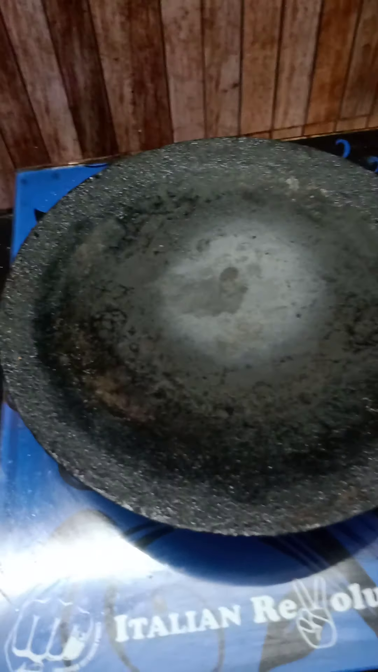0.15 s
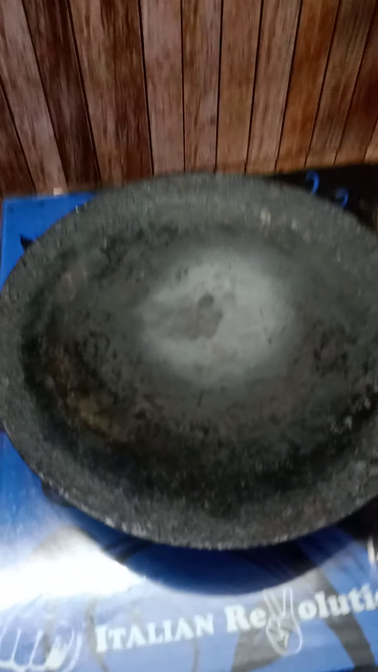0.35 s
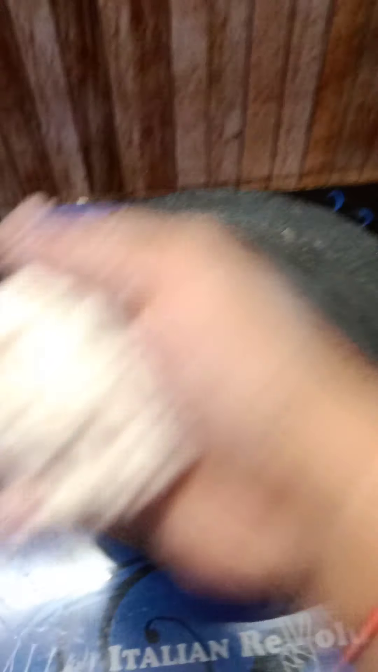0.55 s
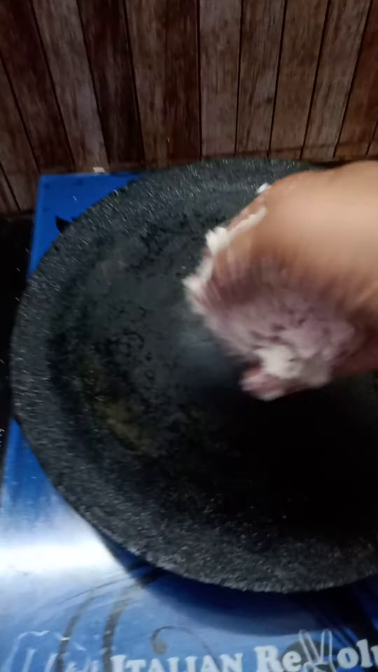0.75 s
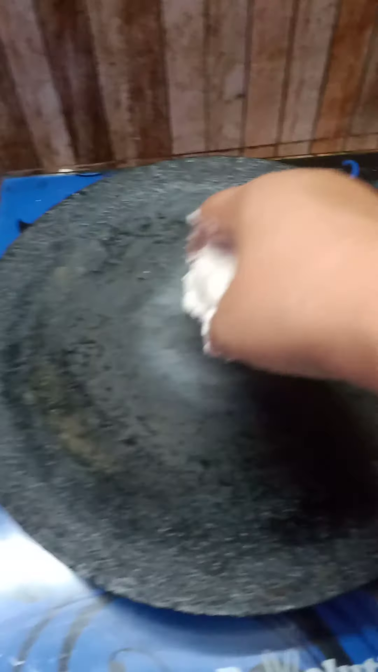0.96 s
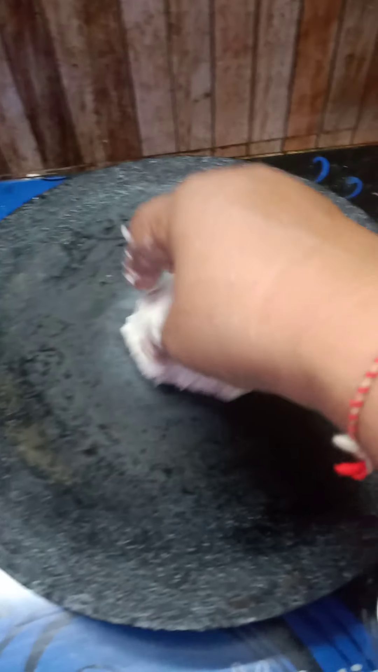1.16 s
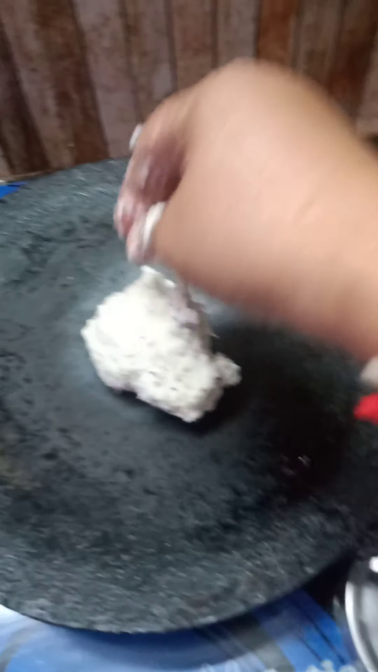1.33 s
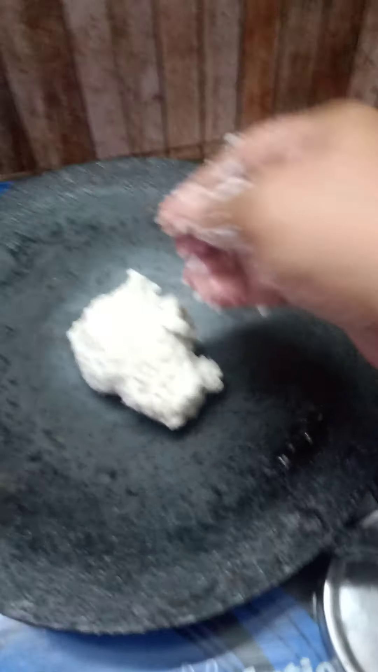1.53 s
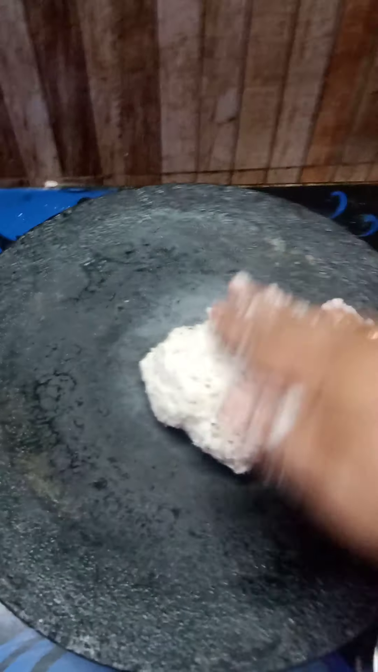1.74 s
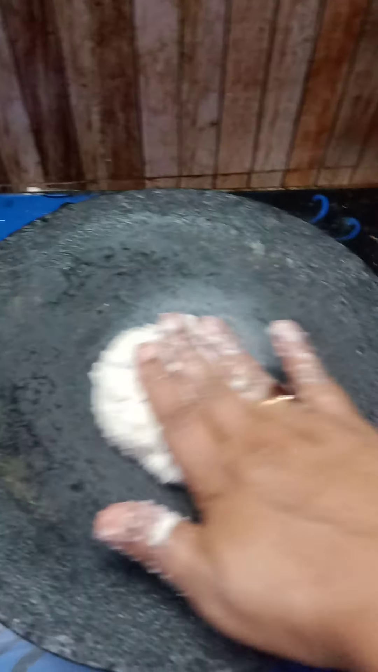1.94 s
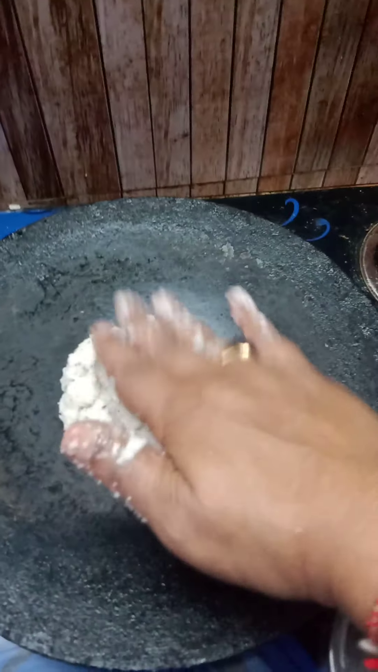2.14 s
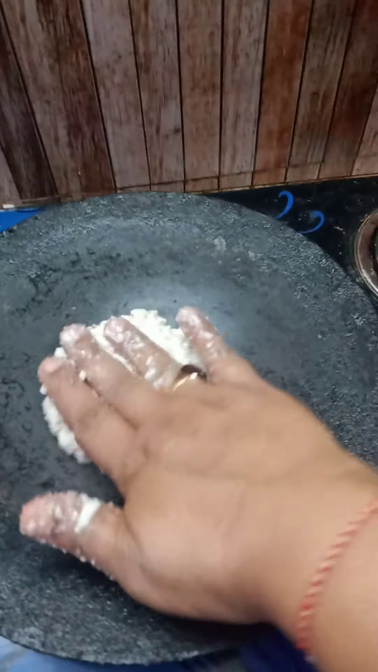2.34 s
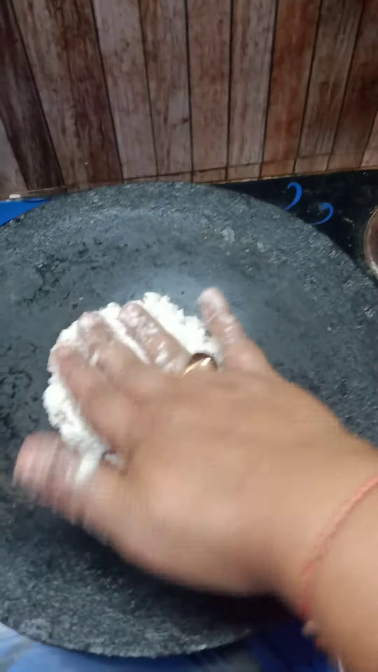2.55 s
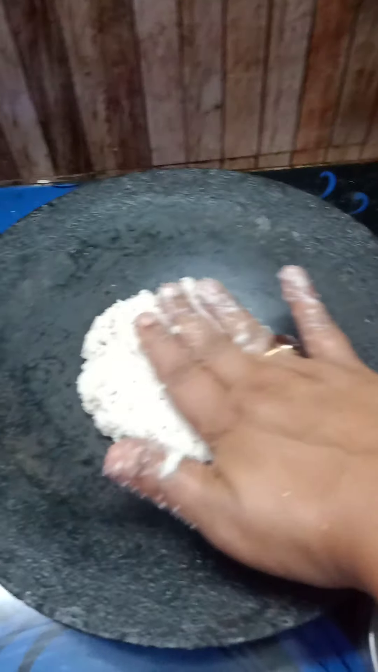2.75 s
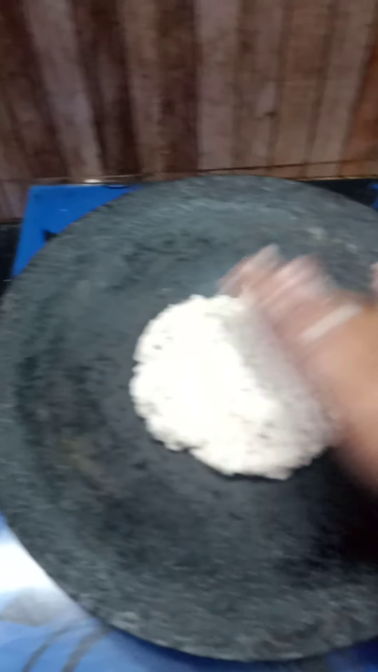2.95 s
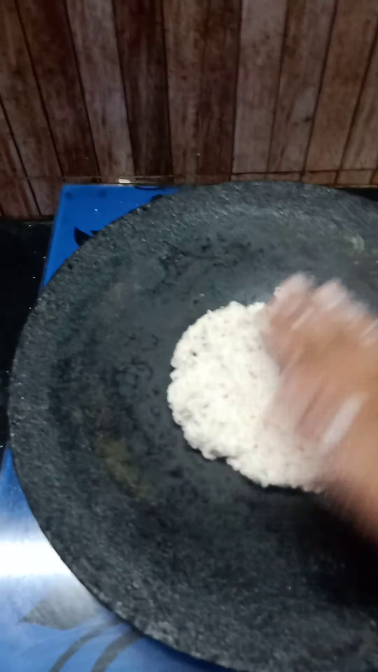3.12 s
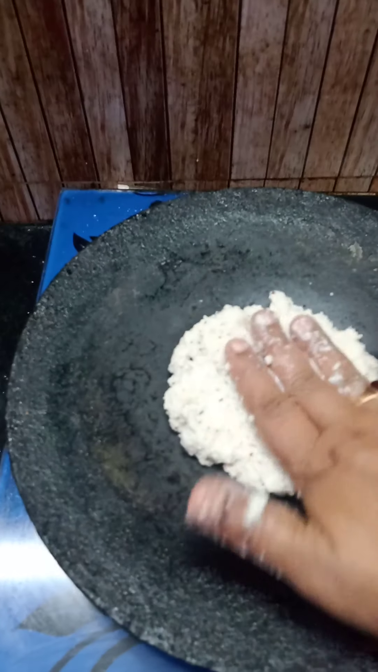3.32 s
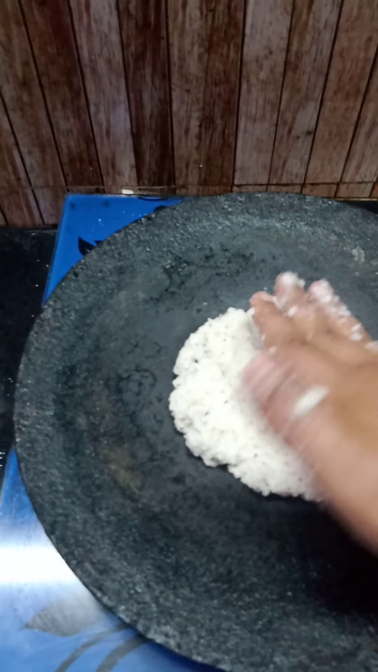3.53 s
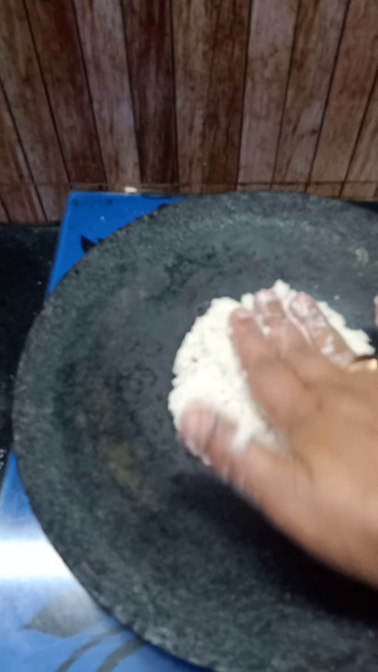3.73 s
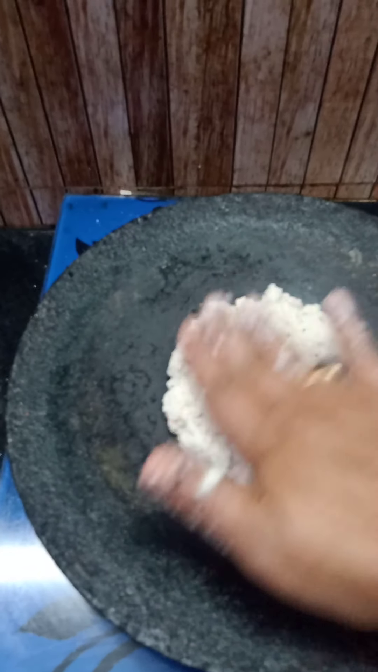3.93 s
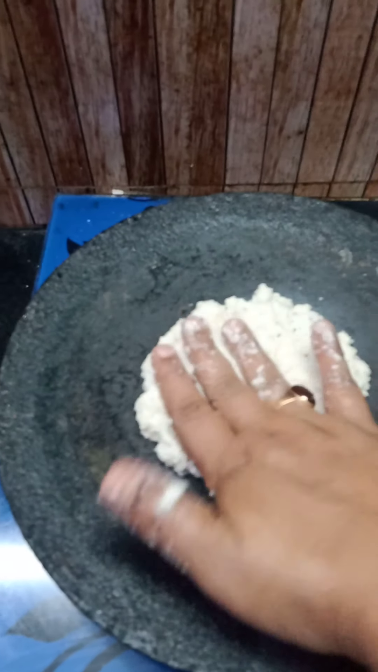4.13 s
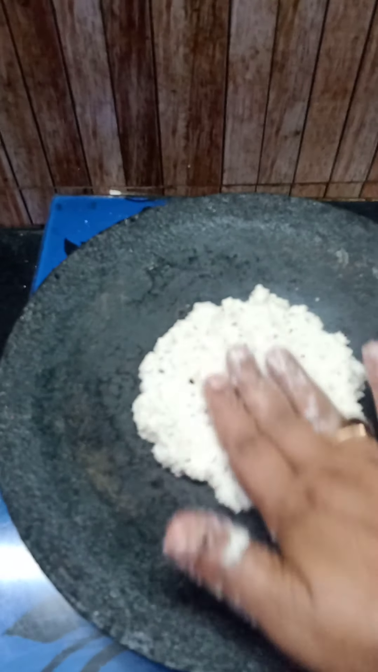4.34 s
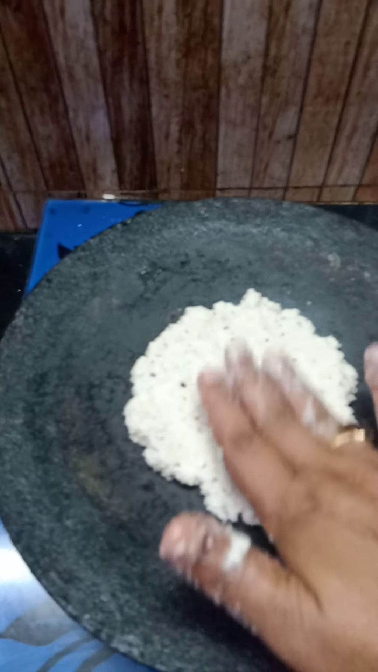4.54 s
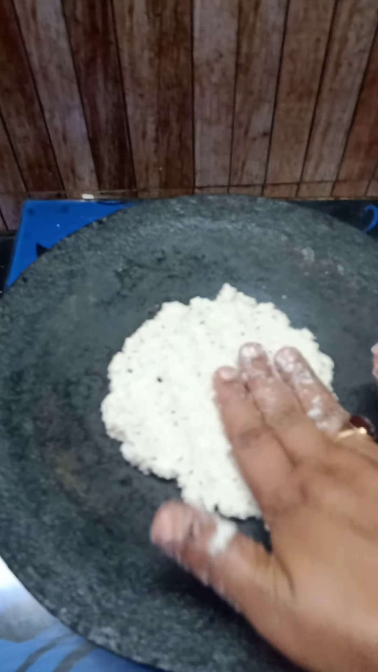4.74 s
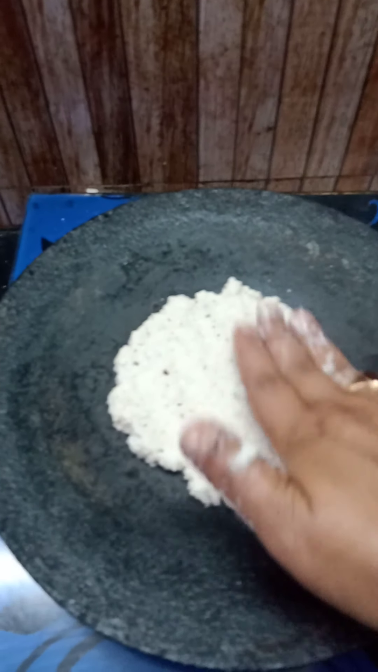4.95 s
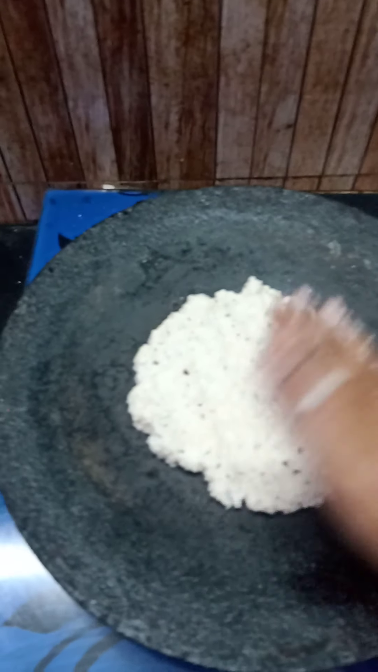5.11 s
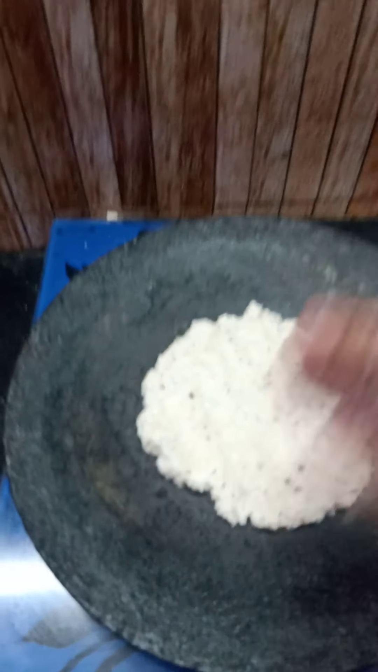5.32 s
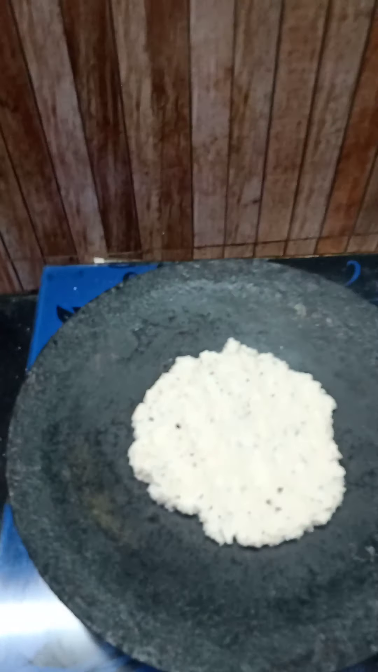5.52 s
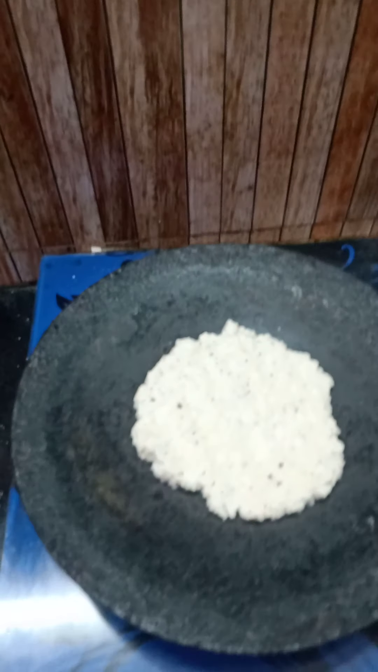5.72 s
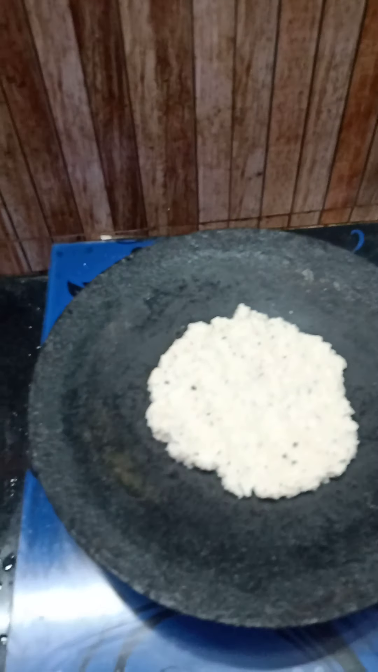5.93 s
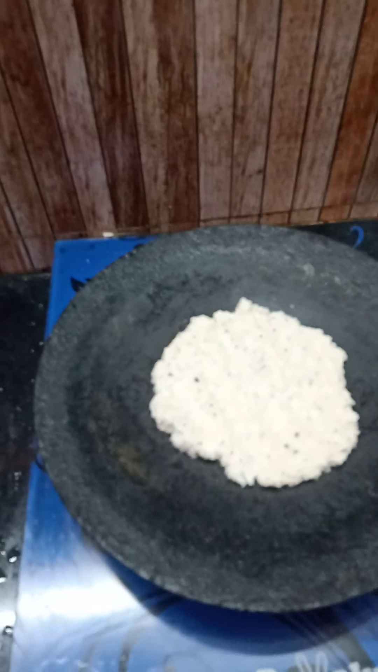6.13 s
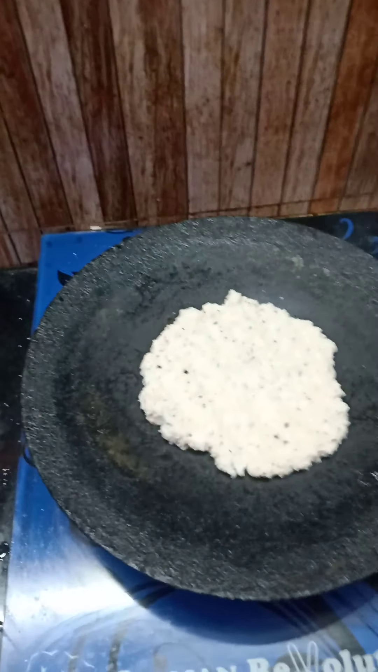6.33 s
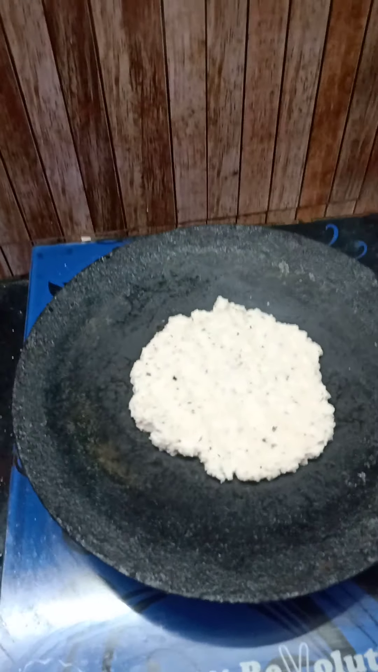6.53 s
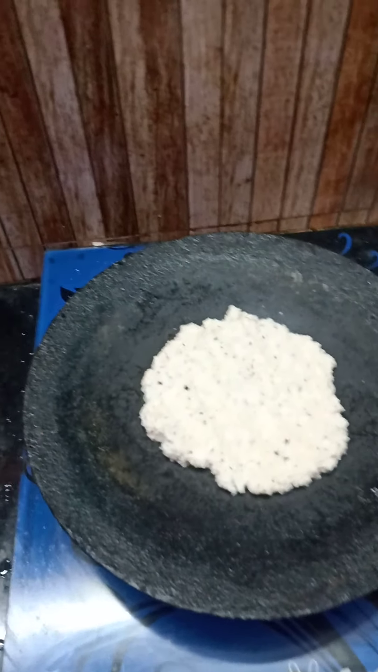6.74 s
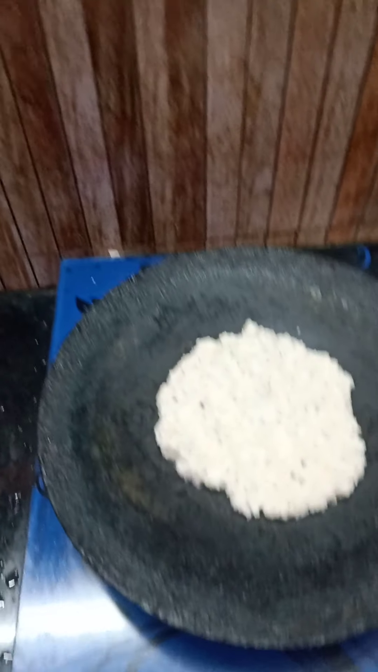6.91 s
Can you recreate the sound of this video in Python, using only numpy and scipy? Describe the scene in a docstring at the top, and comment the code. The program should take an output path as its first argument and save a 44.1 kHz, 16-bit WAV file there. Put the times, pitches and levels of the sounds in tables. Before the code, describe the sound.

Wet dough sizzles loudly on hot iron, pulsing as a hand pats it, with sharp blister pops, then softens to a gentler crackling fizz.

```python
"""A small kitchen: a lump of wet dough is laid on a hot iron griddle and patted flat by hand, close by.
Random bursts of steam sputter from under the dough and finer bursts fizz as droplets at its rim; each
press swells them, many releases bring a lull, and at the end both ease. Faint treble ticks lead in.
Blisters pop as torn clicks ringing a cavity, knocks are filtered blows, bumps are low decaying sines,
and scuffs are resonant slips, over a burner of soft noise with a thin wavering whistle and a mains hum."""
import sys
import numpy as np
from scipy import signal
from scipy.fft import rfft, irfft
from scipy.io import wavfile
from scipy.ndimage import uniform_filter1d

SR = 44100
rng = np.random.default_rng(int(sys.argv[2]) if len(sys.argv) > 2 else 0)


def to_wav(sig):
    """Store sig (one row per channel, or 1-D mono) as 16-bit WAV at the path in sys.argv[1].

    Samples outside -1..1 are clipped; the rate is SR.
    """
    pcm = np.clip(np.atleast_2d(sig), -1, 1) * 32767
    pcm = np.round(pcm).astype(np.int16)
    wavfile.write(sys.argv[1], SR, pcm.T)  # frames by channels


N = 311787
TIME = np.arange(N) / SR  # seconds
TOUCH_S, WETTING_S = 1.2025, 0.048  # the dough meets the iron, and its underside takes this long to wet

# Spectrum of the bursting steam pockets: frequency_hz, level_db
STEAM_COLOUR = [(800, -41.5), (1100, -21), (1350, -9.5), (1720, -6.5), (1900, -7.5), (2250, -2),
                (2750, 0.5), (3050, -2), (3550, -3.5), (3900, -8.5), (4250, -10.5), (5100, -21),
                (5900, -29.5), (9000, -56.5)]
# Spectrum of the fizzing droplets: frequency_hz, level_db
FIZZ_COLOUR = [(2940, -34), (5000, -22), (5700, -13), (6300, -8), (6700, -9), (7300, -3), (8100, 0.5),
               (9100, -2), (9800, -5), (10500, -3), (12100, -4.5), (13650, 0), (14500, -4), (15400, -5)]


def undb(db):
    """Decibels to gain."""
    return 10 ** (np.asarray(db) / 20)


def rms(x):
    """Root mean square."""
    return np.sqrt(np.mean(x ** 2))


def lowpass(x, hz):
    """The part of x below hz, without phase shift."""
    return signal.sosfiltfilt(signal.butter(4, hz, fs=SR, output="sos"), x)


def resonance(x, hz, width_hz):
    """Two-pole band-pass with gain 1 at the centre."""
    return signal.lfilter(*signal.iirpeak(hz, hz / width_hz, fs=SR), x)


def response(points, size=4096):
    """The shortest causal (minimum-phase) click with the given (Hz, dB) spectrum shape; peak 1."""
    hz, db = np.transpose(points)
    bins_hz = np.maximum(np.arange(size // 2 + 1) * SR / size, 1)
    gain = undb(np.interp(np.log(bins_hz), np.log(hz), db))
    # folding the cepstrum forward packs the energy at the start
    cepstrum = irfft(np.log(gain))
    cepstrum[1:size // 2] *= 2
    cepstrum[size // 2 + 1:] = 0
    click = irfft(np.exp(rfft(cepstrum)))
    return click / np.abs(click).max()


def ring(x, click):
    """Play the click at every impulse of x."""
    return signal.fftconvolve(x, click)[:N]


def colour(x, points):
    """Filter x by the (Hz, dB) spectrum; rms 1."""
    y = ring(x, response(points))
    return y / rms(y)


def walk(rate):
    """Smooth chance: a line through random knots, rate knots a second; rms 1."""
    knots = rng.standard_normal(8192)
    y = np.interp(TIME * rate, np.arange(len(knots)), knots)
    return y / rms(y)


def curve(points):
    """Straight lines over time through (s, value) points."""
    return np.interp(TIME, *np.transpose(points))


def add(out, s, sound):
    """Mix a sound in at time s."""
    i = max(int(s * SR), 0)
    out[i:i + len(sound)] += sound[:max(N - i, 0)]


def bursts(per_s, spread_db):
    """Impulses at random moments, of random sign and scattered size; even power at any rate."""
    share = np.clip(per_s / SR, 1e-4, 1)
    happens = rng.random(N) < share
    size = undb(spread_db * np.minimum(rng.standard_normal(N), 3))
    return happens * size * rng.choice([-1, 1], N) / np.sqrt(share)


def stove():
    """Turbulent flame as soft wandering noise, a thin whistle of unsteady pitch, and steady mains hum."""
    # Spectrum of the burner's rush: frequency_hz, level_db
    rush_colour = [(20, -25), (42, -13), (75, -1.5), (164, -3), (312, -7), (717, -12), (1000, -14),
                   (2700, -17), (3600, -20), (5400, -40.5), (7400, -29), (10500, -41.5), (13800, -41),
                   (15500, -49)]
    # Mains hum partials: frequency_hz, rms_db
    hum_partials = [(60, -60.5), (120.5, -61)]
    rush = colour(rng.standard_normal(N), rush_colour) * undb(-50.5 + 0.46 * walk(rate=12))
    # the whistle fades briefly as the hand passes
    gap_s, gap_length_s, gap_db = 0.71, 0.16, -11
    whistle_hz = 3080 + 8 * walk(rate=14) + 90 * walk(rate=400)
    fade_db = gap_db * np.exp(-((TIME - gap_s) / gap_length_s) ** 4)
    whistle_db = -58.5 + fade_db + 3.7 * walk(rate=110)
    whistle = np.sin(2 * np.pi * np.cumsum(whistle_hz) / SR) * undb(whistle_db)
    hum = sum(np.sqrt(2) * undb(db) * np.sin(2 * np.pi * hz * TIME) for hz, db in hum_partials)
    return rush + whistle + hum


def scuffs():
    """Brief rubs of handling: dense little slips through a resonance, swelling and fading."""
    # Rubs: middle_s, length_s (middle to 1/e), centre_hz, width_hz (each of two passes),
    # level_db (rms before the swell and the final dulling)
    rubs = [(0, 0.099, 1900, 2600, -46), (.04, 0.15, 860, 500, -49), (0.053, .1, 332, 250, -50),
            (0.385, 0.16, 430, 300, -52), (0.544, 0.096, 410, 330, -47.5), (0.502, 0.14, 1660, 500, -55.5),
            (1.011, .004, 2300, 2180, -43), (1.037, 0.043, 2050, 2200, -49.5),
            (1.14, 0.079, 346, 160, -50.5), (2.417, 0.059, 525, 300, -37.5), (3.735, .02, 1290, 120, -33.5),
            (3.758, 0.029, 458, 300, -32), (5.89, 0.03, 300, 400, -36.5), (5.974, 0.016, 890, 500, -39)]
    out = np.zeros(N)
    for middle_s, length_s, hz, width_hz, db in rubs:
        slips = bursts(2500, spread_db=-3.5)
        rub = resonance(resonance(slips, hz, width_hz), hz, width_hz)
        swell = np.exp(-((TIME - middle_s) / length_s) ** 2)
        out += rub / rms(rub) * undb(db) * swell
    return lowpass(out, 5000)


def bumps(swell_s=0.004):
    """Soft contacts: sines that swell and die within a few low cycles."""
    # Low bumps: start_s, level_db (peak of the envelope), pitch_hz
    contacts = [(0.233, -38, 70), (0.249, -34, 68), (.48, -40, 150), (1.408, -29, 105), (1.442, -34, 85),
                (1.48, -30, 95), (3.009, -34, 130)]
    out, t = np.zeros(N), TIME[:SR // 6]
    envelope = t / swell_s * np.exp(1 - t / swell_s)
    for s, db, hz in contacts:
        add(out, s, undb(db) * envelope * np.sin(2 * np.pi * hz * t))
    return out


def pops(width_hz=700, crack_db=-7):
    """A blister snaps open, its cavity rings for a few cycles, and spray flies."""
    # Bursting blisters: start_s, peak_db (dry), pitch_hz, spray_db (relative to the cavity)
    blisters = [(.739, -30, 3740, -26), (.832, -36, 4300, -6), (2.757, -13, 2800, -1),
                (3.676, -8.5, 2920, -5), (4.237, -10.5, 2800, 1), (5.976, -7.5, 2440, -17),
                (6.784, -14, 2900, -8), (6.868, -15.5, 2500, -16), (6.925, -15.5, 2900, -10),
                (6.9974, -14, 2720, -12)]
    out, steam, spray = np.zeros(N), response(STEAM_COLOUR), response(FIZZ_COLOUR)
    t = TIME[:len(steam)]
    for s, db, hz, spray_db in blisters:
        tear = 0.018 * rng.standard_normal(len(t)) * np.exp(-t / 0.00036)
        tear[0] = 1  # the snap itself
        cavity = resonance(steam, hz, width_hz)
        cavity = cavity / np.abs(cavity).max()
        blister = cavity + undb(crack_db) * steam + undb(spray_db) * spray
        pop = signal.fftconvolve(tear, blister)
        add(out, s, undb(db) * pop / np.abs(pop).max())
    return out


def ticks():
    """Faint treble ticks, thickest around the touch: sparse random impulses through a high resonance."""
    nearing = np.exp(-((TIME - TOUCH_S) / 0.18) ** 2)
    impulses = bursts(80, spread_db=4)
    return undb(-55.5) * nearing * resonance(resonance(impulses, 14000, 5000), 14000, 5000)


def hand():
    """Each press swells the steam and may brighten or darken it; a lull or small rise may follow."""
    # Presses on the dough: start_s, release_s, swell_db, brightening_db (negative darkens),
    # lull_db (dip after release, negative rises)
    presses = [(1.314, 1.396, 0.5, -1.5, 1.5), (1.49, 1.68, 1, 0, 0.5), (2.12, 2.207, 2, 0, 0),
               (2.45, 2.638, 2, 3.5, 1), (2.683, 2.721, 2.5, -3, 3.5), (2.823, 2.958, 2, 3, 0),
               (3.03, 3.149, 0.5, -1, 2), (3.33, 3.642, 1, 1, 4), (3.69, 3.97, 1.5, 0.5, 0.5),
               (4.09, 4.21, 2.5, 3.5, 3), (4.253, 4.37, 1, 0.5, -0.5), (4.44, 4.55, 1.5, 2.5, -1),
               (4.558, 4.738, 2, -.5, 0.5), (4.802, 4.948, 1.5, 1, 1), (5.074, 5.28, 1.1, -1.5, -2)]
    attack_s, release_time_s, lull_s = 0.05, 0.016, 0.019  # a lull is deepest lull_s after the release
    swell, bright, lull = np.zeros((3, N))
    for start_s, release_s, swell_db, bright_db, lull_db in presses:
        pushing = np.clip((TIME - start_s) / attack_s, 0, 1)
        holding = np.clip(1 - (TIME - release_s) / release_time_s, 0, 1)
        force = pushing * holding
        since = np.maximum(TIME - release_s, 0) / lull_s
        swell += swell_db * force
        bright += bright_db * force
        lull += lull_db * since * np.exp(1 - since)
    return swell, bright, lull


def boiling(wander_db=0.44, tilt_wander_db=0.5):
    """Steam level, steam tilt and fizz level in dB, as uneven contact, presses and drying shape them."""
    # Resting droplet fizz, before the final trim: time_s, level_db
    fizz_level = [(1.26, -23.5), (1.32, -24.5), (1.82, -27.5), (2.05, -23), (3.23, -25), (3.34, -27.5),
                  (3.47, -24), (3.69, -27), (5.02, -25), (5.76, -32), (6.97, -36), (7.05, -37)]
    # Resting brightness, high under the fresh lump and lower once flat: time_s, tilt_db (to small pockets)
    steam_tilt = [(1.3, 6), (1.87, 4), (1.98, 0.5), (2.15, 2.5), (3.3, 0), (4.5, 0), (6.08, -2),
                  (6.25, 0.5), (7.05, 0)]
    swell, bright, lull = hand()
    contact = wander_db * walk(rate=24)
    # the steam rests level while the dough is worked, then fades to a floor as its underside dries
    steam_db, drying_from_s, drying_db_per_s, dry_steam_db = -22.5, 5.22, 5.5, -31
    drying_s = np.maximum(TIME - drying_from_s, 0)
    resting_db = np.maximum(steam_db - drying_db_per_s * drying_s, dry_steam_db)
    tilt_db = curve(steam_tilt) + bright + tilt_wander_db * walk(rate=18)
    # only part of the swell and lull reaches the droplets at the rim
    fizz_db = curve(fizz_level) + 0.35 * swell - 0.8 * lull + 0.5 * contact
    return resting_db + swell - lull + contact, tilt_db, fizz_db


def sizzle():
    """Steam pockets burst in quick sputters and droplets fizz, over a low simmer with narrow resonances."""
    # First flash of steam, while the hand still cups the lump: frequency_hz, level_db
    flash_colour = [(900, -42), (1600, -10.5), (2050, -11.5), (2650, 1.5), (3600, -4), (4400, -10.5),
                    (5500, -26), (7000, -10), (8000, -4), (8700, -12), (9800, -14.5), (12800, -9.5),
                    (13850, -4), (15500, -16)]
    # Low simmer under the dough: frequency_hz, level_db
    simmer_colour = [(76, -44), (130, -18), (189, -2.5), (273, -9.5), (354, 1), (455, -12), (496, -0.5),
                     (1100, -4), (1300, -0.5), (1690, -27), (2860, -120)]
    # Narrow low-mid resonances colouring the sizzle, as from close reflections:
    # frequency_hz, width_hz, level_db (relative)
    body_modes = [(184, 34, -4), (504, 24, -1), (596, 74, -4), (667.4, 9.1, 3.5), (749, 12, 5),
                  (841, 11, 3.5), (982, 133, -0.5), (1315, 25, -1)]
    # Lift of the finest spray, highest while the dough is fresh: time_s, gain_db
    mist_gain = [(1.6, 5.5), (2.1, 1.5), (3.0, 4.5), (4.0, 2), (7.0, 2.5)]
    steam_db, tilt_db, fizz_db = boiling()
    wetted = np.clip((TIME - TOUCH_S) / WETTING_S, 0, 1) ** 2
    vigour = undb(fizz_db - fizz_db.max())  # gentler boiling means fewer bursts

    # steam lifts the dough and escapes in puffs; taking off the local average leaves quick sputter
    puffs = walk(rate=85)
    sputter = puffs - uniform_filter1d(puffs, size=SR // 25)
    pockets = bursts(12000 * vigour, spread_db=2.0) * undb(0.47 * sputter + 0.41 * walk(rate=280))
    steam = colour(pockets, STEAM_COLOUR)
    # small pockets sound high, large ones low
    large, small = lowpass(steam, 2200), steam - lowpass(steam, 3400)
    steam = steam + large * (undb(-0.55 * tilt_db) - 1) + small * (undb(0.5 * tilt_db) - 1)

    # a bursting pocket also throws droplets
    droplets = bursts(22000 * vigour, spread_db=4.5) * undb(0.5 * sputter + 0.5 * walk(rate=130))
    fizz = colour(droplets + 0.5 * pockets, FIZZ_COLOUR)
    coarse = lowpass(fizz, 12500)
    fizz = coarse + (fizz - coarse) * undb(curve(mist_gain))
    hiss = steam * undb(steam_db) + fizz * undb(fizz_db + 0.65)

    # the first flash gives way to steady boiling, by an equal-power crossfade
    fresh = np.exp(-((TIME - TOUCH_S) / 0.2) ** 4)
    flash = colour(bursts(14000, spread_db=2.0), flash_colour) * undb(steam_db + 2.0)
    hiss = np.sqrt(1 - fresh) * hiss + np.sqrt(fresh) * flash

    # the low body follows the steam and grows as the steam darkens
    resonant = sum(undb(db) * resonance(pockets, hz, width_hz) for hz, width_hz, db in body_modes)
    simmer = colour(bursts(3000 * vigour, spread_db=0.5), simmer_colour)
    body = undb(-42.5) * (simmer + resonant / rms(resonant))
    body_db = 0.7 * (steam_db - np.median(steam_db)) - 0.42 * tilt_db
    return wetted * (hiss + body * undb(body_db))


def knocks(bounce_s=0.00734, bounce_db=-3, tail_db=-32, tail_s=0.063, boom_hz=232, boom_db=-17, boom_s=0.016):
    """A dull blow, a duller rebound, a hollow low ring and a short rumble."""
    # Dull knocks nearby: start_s, level_db
    blows = [(2.798, -28), (5.296, -25), (5.871, -30.5), (6.093, -17), (6.2474, -18.5), (6.868, -28.5)]
    # Spectrum of a blow: frequency_hz, level_db
    blow_colour = [(55, -23), (130, 0), (230, 3), (450, -0.5), (700, -0.5), (1100, 0), (1400, -37),
                   (2500, -68)]
    out, blow, t = np.zeros(N), response(blow_colour), TIME[:SR // 4]
    boom = undb(boom_db) * np.sin(2 * np.pi * boom_hz * t) * np.exp(-t / boom_s)
    for s, db in blows:
        after = undb(tail_db) * rng.standard_normal(len(t)) * np.exp(-t / tail_s)
        after[int(bounce_s * SR)] += undb(bounce_db)
        push = lowpass(after, 830) + 0.14 * after  # rebound and rumble are duller than the blow
        push[0] += 1
        add(out, s, undb(db) * (signal.fftconvolve(push, blow)[:len(t)] + boom))
    return out


def kitchen(x, wall_s=0.0056, wall_db=-21, room_db=-11, t60_s=0.39, dull_hz=2200):
    """An inverted echo from the panelled wall behind the stove, then a short, dull diffuse tail."""
    t = TIME[:SR // 2]
    tail = rng.standard_normal(len(t)) * undb(-60 * t / t60_s) * (t > wall_s)
    tail = undb(room_db) * tail / np.linalg.norm(tail)
    echo = 0.54 * tail + lowpass(tail, dull_hz)
    echo[0] += 1  # direct sound
    echo[int(wall_s * SR)] -= undb(wall_db)
    return ring(x, echo / np.linalg.norm(echo))


def scene():
    """Sizzle, ticks, pops and knocks sound in the room, the rest dry; the same in both ears."""
    echoing = kitchen(sizzle() + ticks() + pops() + knocks())
    mono = echoing + bumps() + scuffs() + stove()
    return np.array([mono, mono])


def record(dry):
    """Take off the deepest bass and everything above 15.5 kHz."""
    dry = signal.sosfilt(signal.butter(2, 35, "highpass", fs=SR, output="sos"), dry)
    return signal.sosfiltfilt(signal.ellip(10, 0.05, 60, 15500, fs=SR, output="sos"), dry)


dry = scene()
out = record(dry)
to_wav(out)
```